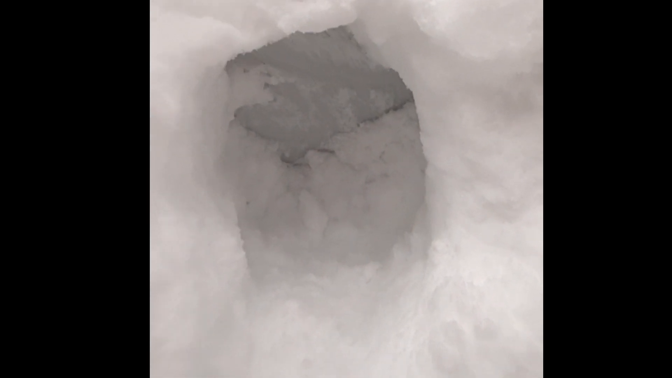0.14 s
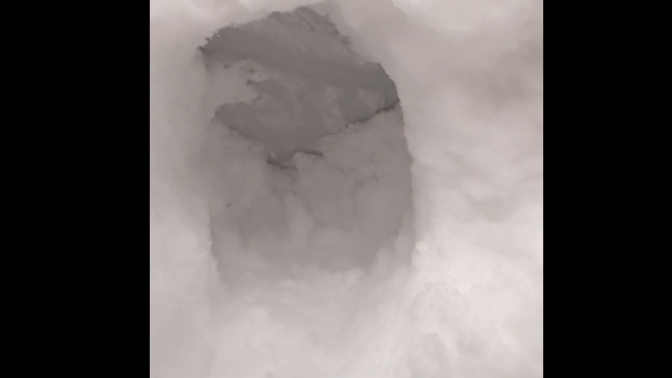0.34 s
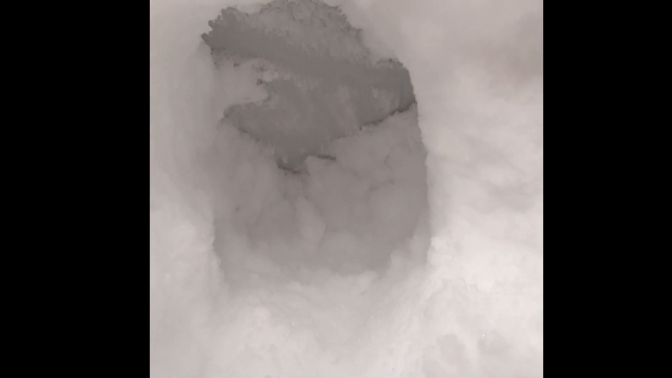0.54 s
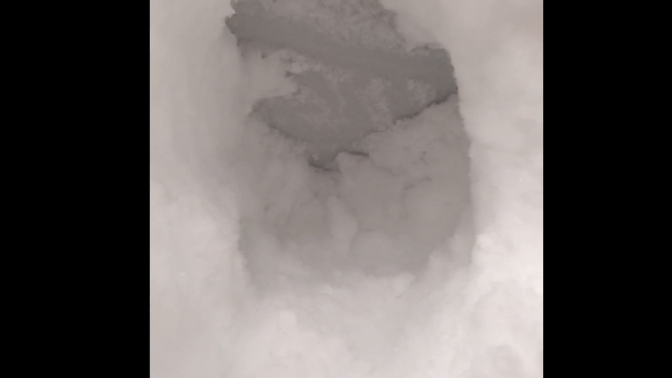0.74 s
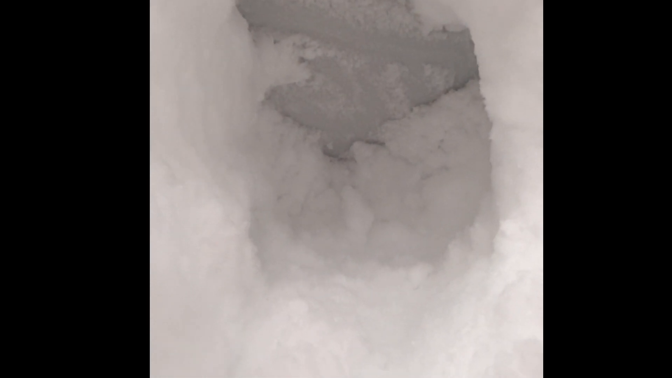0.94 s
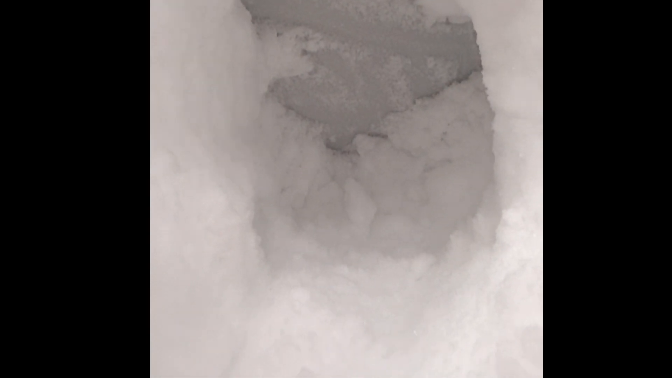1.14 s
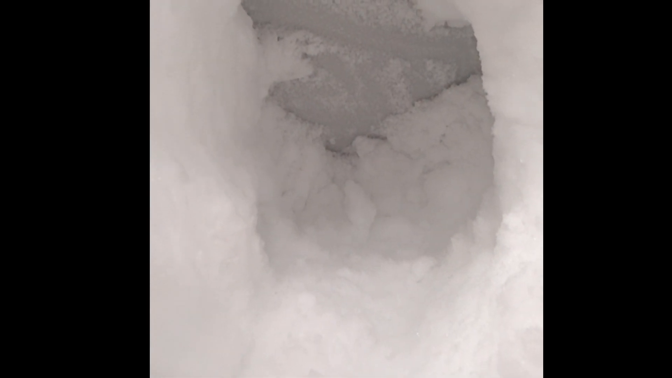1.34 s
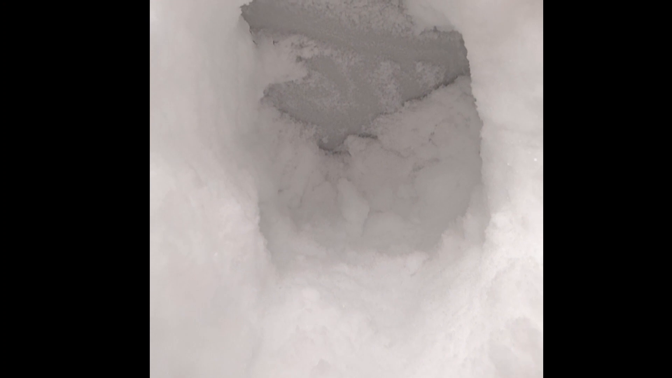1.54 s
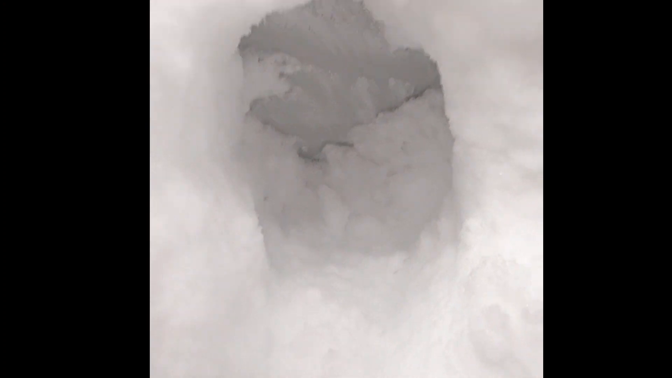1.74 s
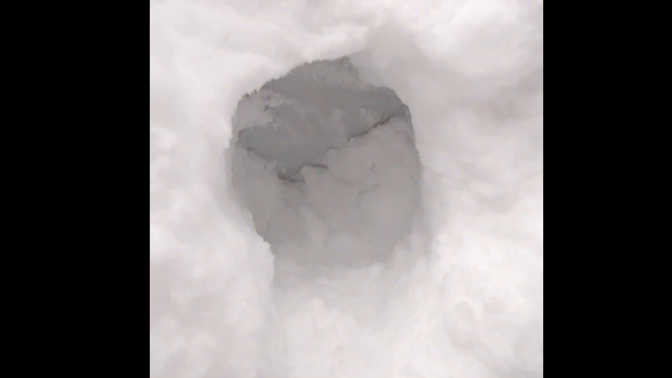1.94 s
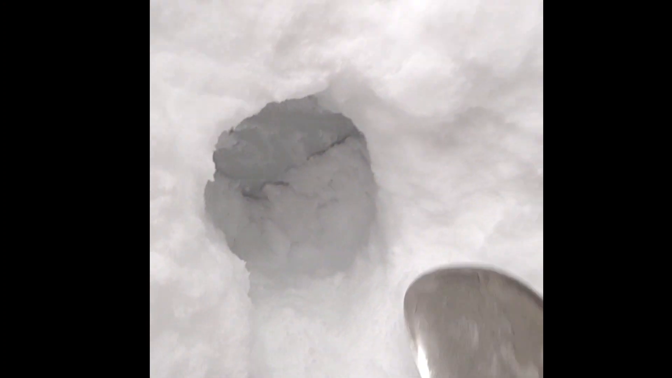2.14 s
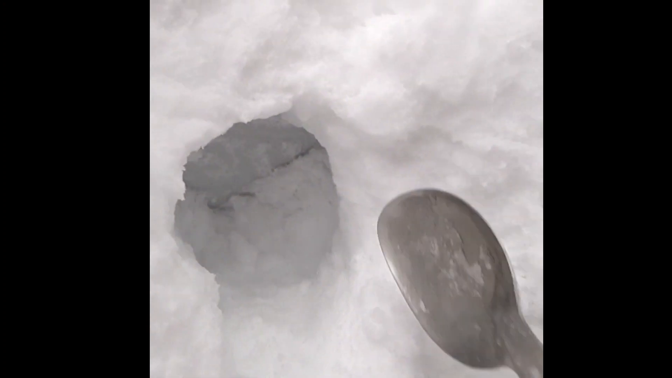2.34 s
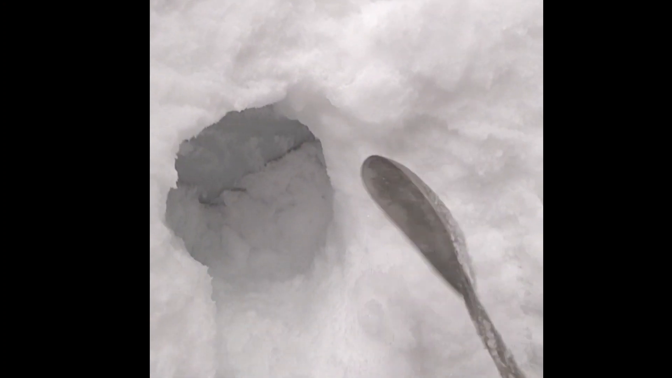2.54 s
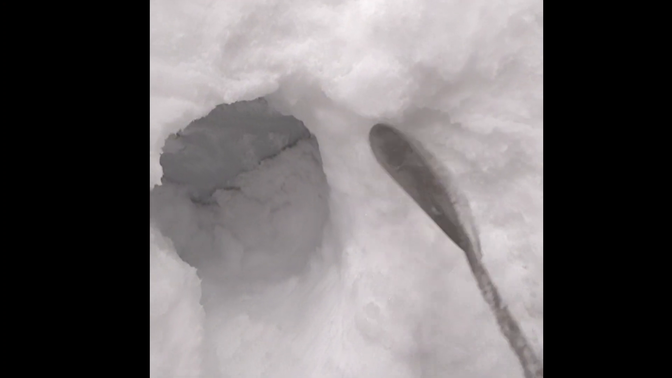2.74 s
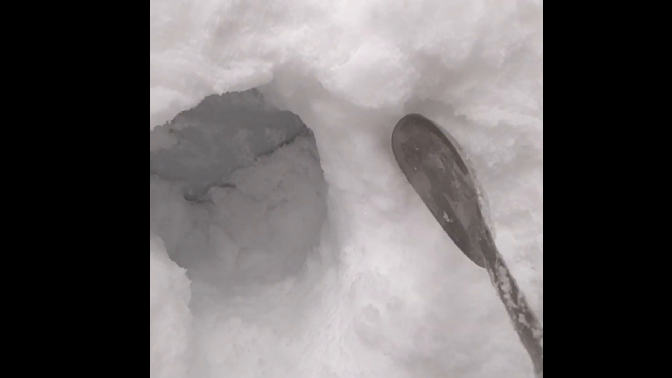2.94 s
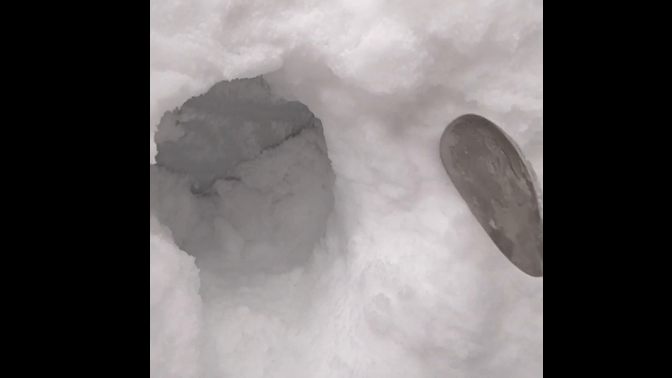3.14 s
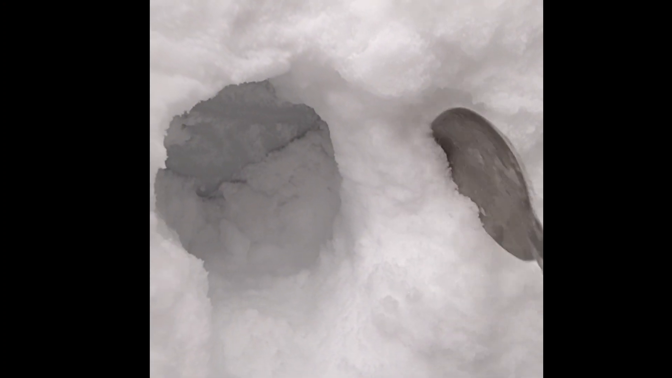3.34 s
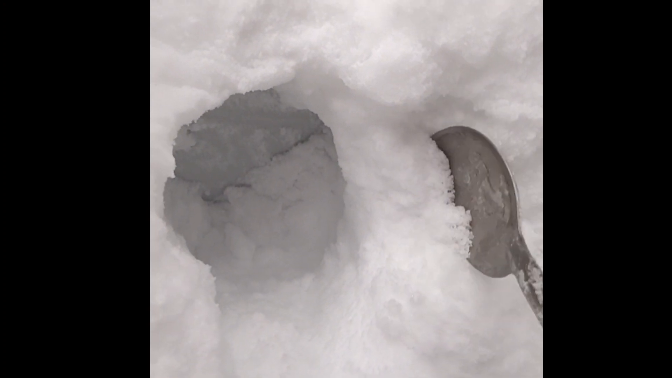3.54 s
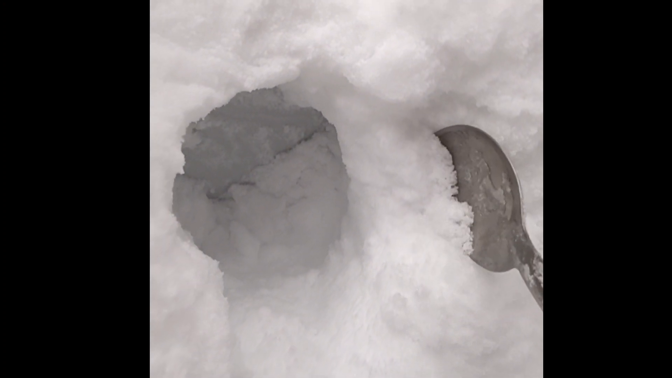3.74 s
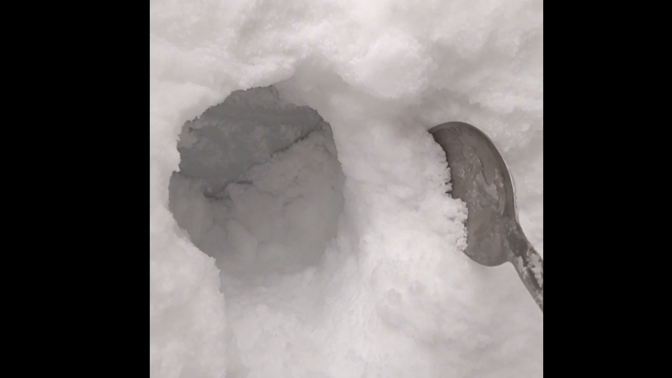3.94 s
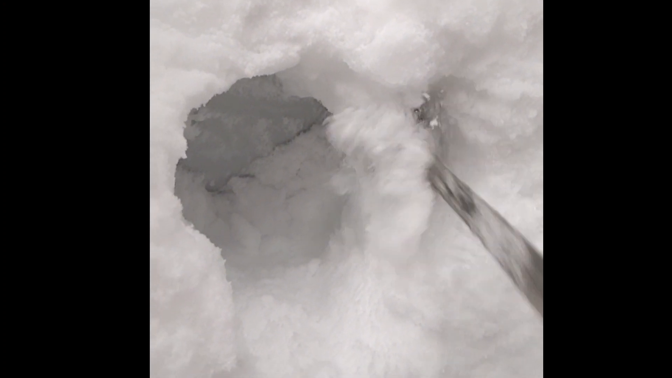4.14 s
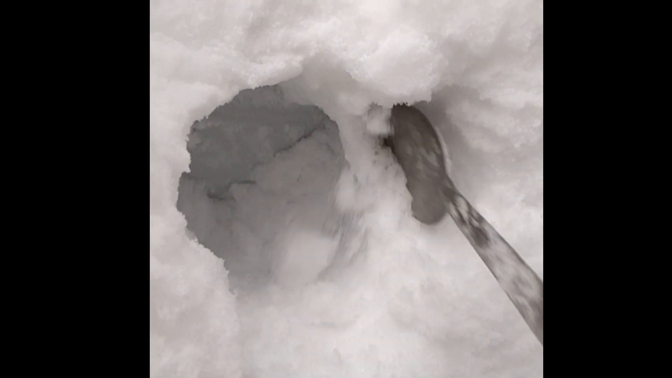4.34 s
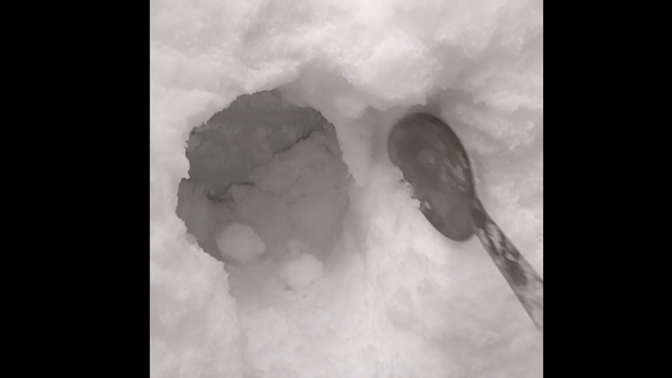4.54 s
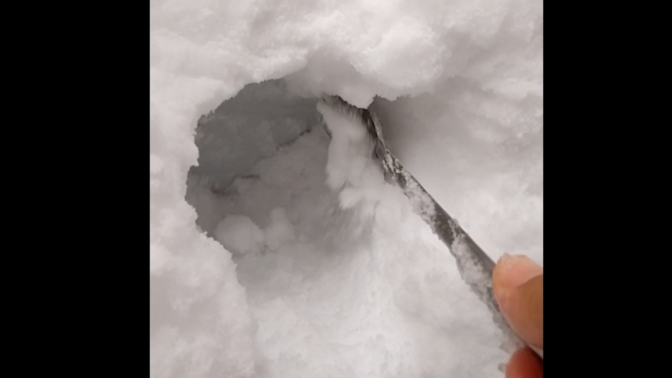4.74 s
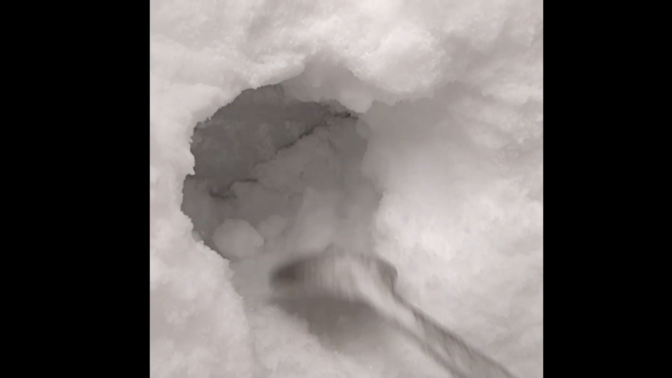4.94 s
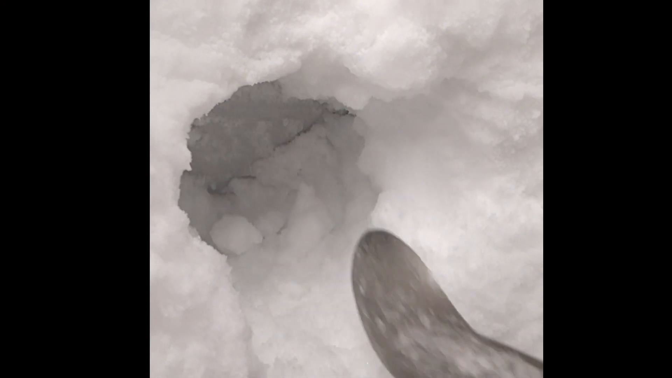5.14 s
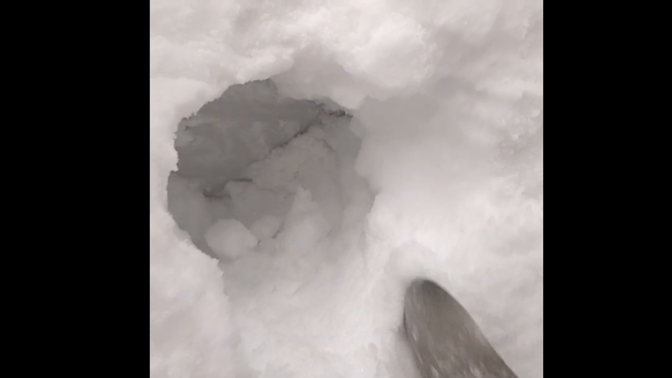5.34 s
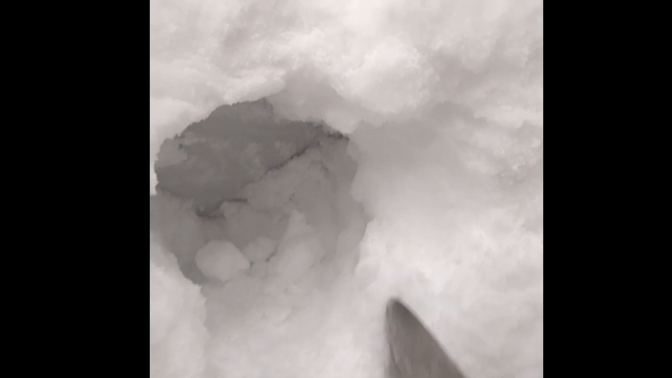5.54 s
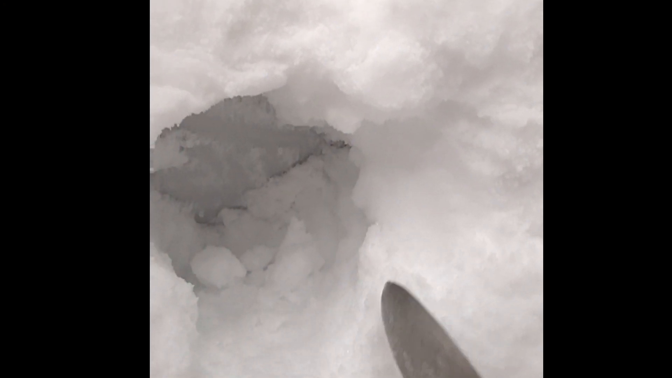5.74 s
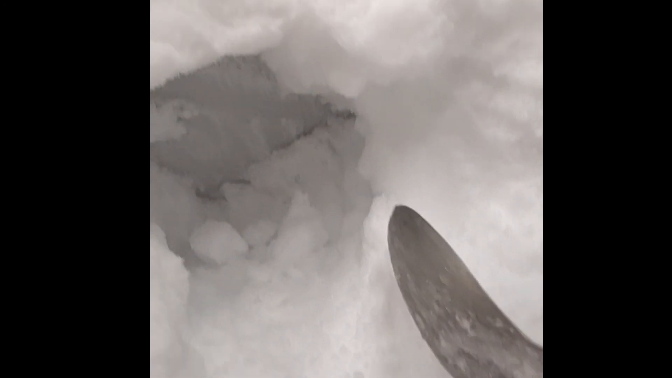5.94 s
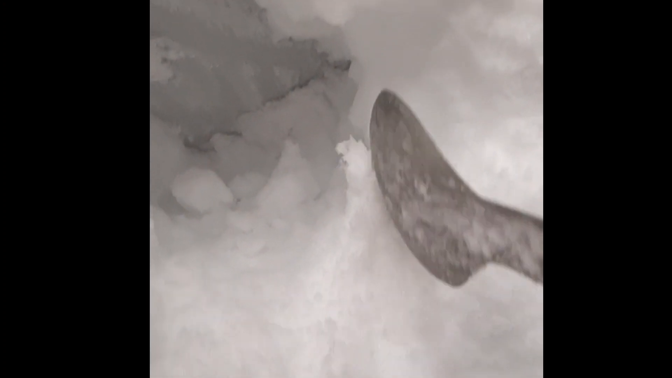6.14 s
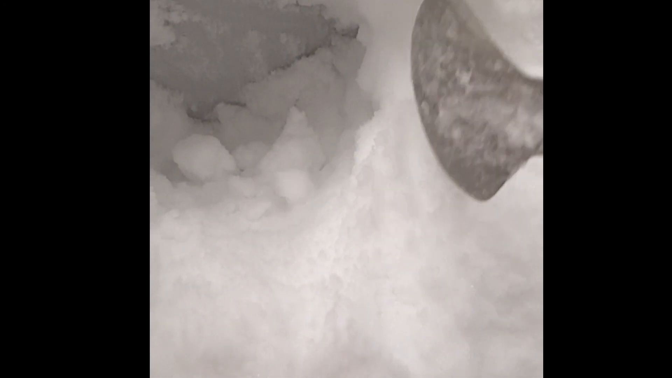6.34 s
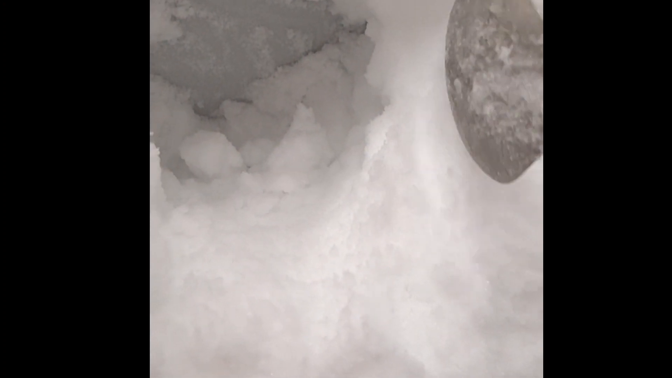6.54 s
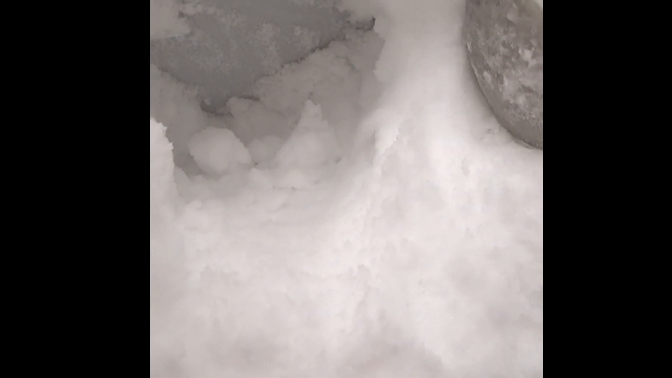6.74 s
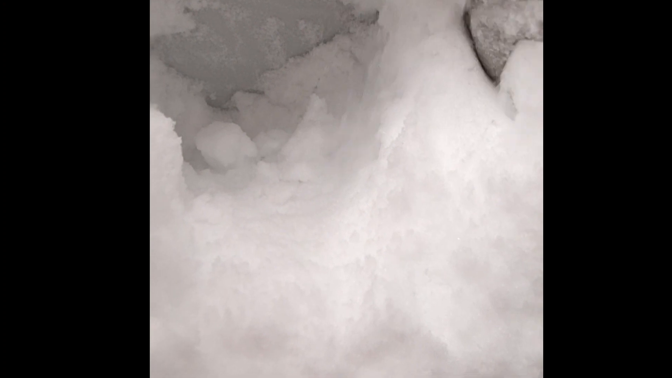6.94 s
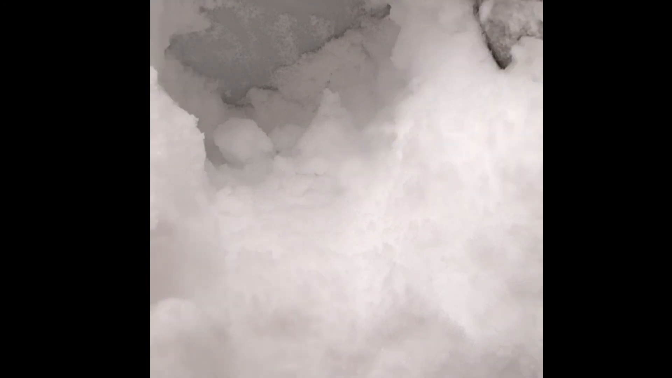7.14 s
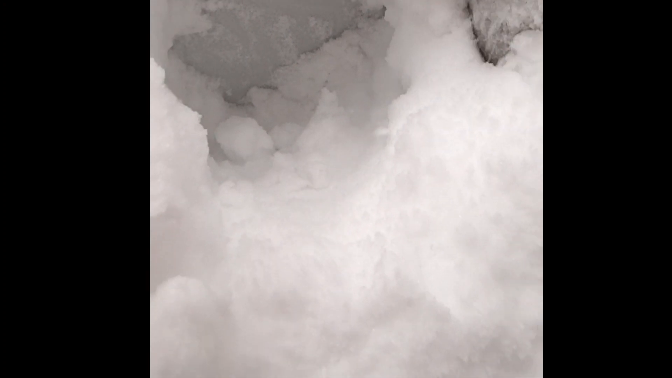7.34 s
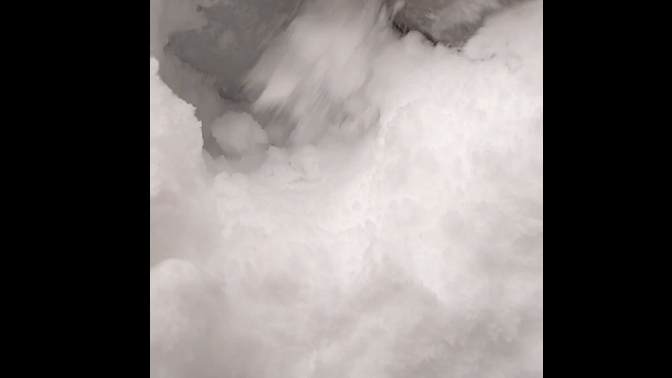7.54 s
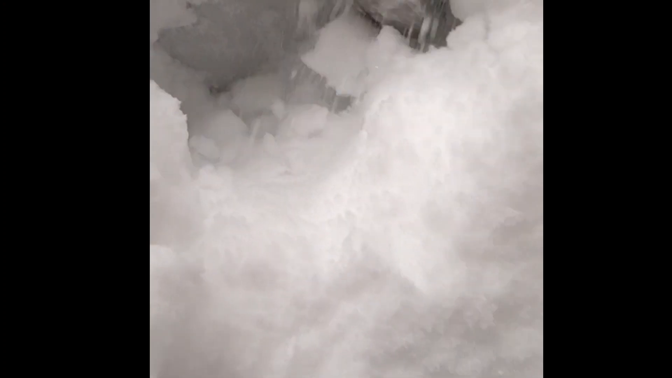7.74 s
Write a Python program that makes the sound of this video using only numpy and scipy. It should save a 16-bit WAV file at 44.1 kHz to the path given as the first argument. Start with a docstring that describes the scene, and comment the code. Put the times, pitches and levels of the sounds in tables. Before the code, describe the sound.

Close up, a spoon grazes, scrapes and then digs hard into crusty frost, crunching and cracking while the freezer wall booms underneath.

```python
"""Light brushing and short scrapes give way to deep crunching digs: a steel spoon in packed freezer frost, close by.
Each stroke is a random train of grain fractures, filtered by the ice, the spoon and the enclosed air.
Single crusts snap as short noise bursts; thumps are sines that sink in pitch.
The freezer wall booms as filtered knocks and sways as low noise.
Beneath lie filtered noise for hiss and fizz, and sines for a faint hum."""
import sys
import numpy as np
from scipy import signal
from scipy.fft import rfft, irfft, next_fast_len
from scipy.io import wavfile
from scipy.ndimage import uniform_filter1d, map_coordinates

SR = 44100
rng = np.random.default_rng(int(sys.argv[2]) if len(sys.argv) > 2 else 0)


def dump_mix(stems):
    """Bounce the given channels to the path in sys.argv[1] as a 16-bit WAV at rate SR."""
    frames = np.atleast_2d(stems).T  # one column per channel
    limited = np.clip(frames, -1, 1)  # hard clip at full scale
    pcm = np.round(limited * 32767).astype(np.int16)
    wavfile.write(sys.argv[1], SR, pcm)


N = 347949

# Room hiss spectrum. Each row: frequency in Hz, relative level in dB.
HISS_SPECTRUM = [(25, -8), (60, -19.5), (105, -1), (170, -25.5), (430, -21), (850, -29.5), (2400, -28.5),
                 (4000, -34), (15500, -52.5)]
# Appliance hum. Each row: frequency in Hz, level in dB rms, onset in seconds.
HUM_TONES = [(54, -57, 0), (119, -58, 5.1), (242, -63, 5.1)]
# Response of the freezer wall. Each row: frequency in Hz, gain in dB.
WALL_RESPONSE = [(40, -44.5), (80, -17), (145, -1), (180, -19.5), (220, -5), (320, -11.5), (480, -17.5),
                 (700, -18), (1400, -25), (2500, -44.5)]
# Resonances of the wall. Each row: frequency in Hz, half width in Hz, gain in dB.
WALL_RESONANCES = [(159, 12, 9.5), (237, 9.8, 0.5), (401.5, 1.3, 17.5), (450, 15, 10)]
# Spectrum of the swaying wall. Each row: frequency in Hz, relative level in dB.
SWAY_SPECTRUM = [(11, -61), (18, 4), (70, 2.5), (110, -4.5), (140, -35), (240, -120)]
# Sway of the wall under the load. Each row: time in seconds, level in dB before the left-right balance.
SWAY_LEVEL = [(0.0, -72), (1.27, -40), (1.36, -50.5), (3.25, -58.5), (3.41, -39.5), (3.84, -30), (4.0, -44),
              (4.22, -36.5), (4.55, -48), (5.45, -50), (6.57, -56), (6.74, -33), (7.49, -41.5), (7.56, -26),
              (7.6, -51.5), (7.89, -46)]
# Likeness of two spread channels. Each row: frequency in Hz, correlation from -1 to 1.
CHANNEL_LIKENESS = [(100, 0.99), (240, 0.68), (480, 0.36), (950, -0.67), (1900, 0.064), (3800, -0.15)]
# Frost giving way against the wall. Each row: start in seconds, peak in dB before the balance and mix gain,
# first pitch in Hz, settled pitch in Hz.
WALL_THUMPS = [(0.664, -37, 404, 162), (1.178, -23.5, 323, 292), (1.940, -35.5, 308, 136),
               (2.908, -37, 293, 133), (3.31, -26.5, 259, 129), (3.387, -26.5, 324, 205),
               (3.46, -20, 266, 198), (3.567, -20, 263, 146), (3.72, -23.5, 129, 69),
               (4.744, -14.5, 239, 132), (5.363, -22, 410, 304), (5.843, -38.5, 139, 119.5),
               (6.44, -22.5, 263, 135), (6.619, -15.5, 220, 118), (6.876, -9, 164.7, 131.4),
               (7.238, -10.5, 196.4, 136), (7.549, -10, 205, 110.4), (7.714, -16, 293, 119)]
# Crusts that snap. Each row: time in seconds, peak in dB before the mix gain, pitch in Hz.
CRUST_SNAPS = [(.731, -31.5, 8300), (0.989, -27.5, 9600), (1.203, -37, 2230), (1.666, -14, 10000),
               (1.9782, -15.5, 11600), (2.0073, -13, 4830), (2.747, -26, 3070), (2.765, -10, 2700),
               (3.306, -5.5, 3160), (3.506, -32, 3170), (3.667, -11, 11700), (3.665, -6, 5260),
               (4.703, -9, 9000), (4.928, -12, 11200), (4.965, -17.5, 10960), (5.065, -11, 13200),
               (5.071, -13, 4560), (5.814, -22.5, 10260), (6.429, -13, 7500), (6.616, 1, 11000),
               (6.768, -4, 10300), (7.154, -12.5, 2830), (7.205, -20, 10000), (7.229, -17, 6700),
               (7.298, -9.5, 3930), (7.383, -23, 4600), (7.436, -19.5, 10180), (7.56, -31, 1400),
               (7.673, -8, 2200), (7.703, 1.5, 11300)]
# Spells of prising at a chunk. Each row: start in seconds, end in seconds, typical peak in dB before the mix gain.
PRISING_SPELLS = [(4.817, 5.032, -22), (7.16, 7.52, -14)]
# Spectrum of crushed ice. Each row: frequency in Hz, gain in dB.
CRUSHED_ICE = [(150, -43.5), (400, 1), (700, -9), (1700, -12), (2500, -4), (4500, -2), (6000, -4.5),
               (7200, -1.5), (8000, -4), (9800, 2), (11500, 4.5), (13000, -5.5), (14500, 3.5),
               (15500, -0.5)]
# Air in the dug pocket. Each row: frequency in Hz, half width in Hz.
POCKET_RESONANCES = [(7300, 240), (9200, 1100)]
# Ways in which the spoon meets the frost. Each row: spoon ring in Hz, spoon ring in dB before the mode factor,
# pocket weight in dB, left-right balance in dB, box resonance in dB.
BRUSH = (4100, 5.3, 10.7, 3.9, 24)
GRAZE = (2682, 5.5, -2.5, -0.5, -19.5)
RASP = (3046, 16, 1.6, 1.4, 9.6)
SCOOP = (3419.5, 1, 4, -2, 0)
SLIDE = (4346, 6.5, 12.5, -2.5, 4)
DIG = (2080, 5, 7.5, -6, 6.5)
RUSTLE = (4080, 16, 7.8, 5.5, 25)
# Strokes of the spoon. Each row: start in seconds, attack in seconds, length in seconds,
# crush level in dB before the mix gain, swell over the hold in dB, wall boom in dB before the wall gains,
# tilt in dB per octave, contact.
SPOON_STROKES = [(0.026, 0.0067, 0.11, -55, -3, -62, -6, GRAZE),
                 (0.175, 0.067, 0.17, -38.5, -4, -79, 4, BRUSH),
                 (.275, 0.024, 0.34, -30, -7, -47.5, -0.5, BRUSH),
                 (0.642, 0.0072, 0.24, -47, -13, -52, -7, BRUSH),
                 (.82, 0.033, .22, -48.5, 4, -51.5, -5, BRUSH),
                 (1.05, 0.012, 0.15, -56.5, -1, -53, -8, BRUSH),
                 (1.147, 0.012, 0.093, -42.5, -10, -47, -12, BRUSH),
                 (1.421, 0.096, .245, -49, 10, -73, 2, RUSTLE),
                 (1.929, 0.0079, .065, -50, -4.5, -48, -3.5, GRAZE),
                 (2.008, 0.0014, 0.022, -34, -6.5, -57, -1.5, SCOOP),
                 (2.177, 0.0083, 0.096, -53.5, -5, -70, 0.5, GRAZE),
                 (2.318, 0.00092, 0.057, -38.5, -15.5, -63, -2, GRAZE),
                 (2.386, 0.032, .25, -54.5, -8, -69, -4, GRAZE),
                 (2.743, 0.0014, 0.025, -43.5, -2.5, -62.5, -1.5, RASP),
                 (2.889, 0.012, 0.036, -24, -7, -31.5, 2, RASP),
                 (3.008, 0.005, 0.17, -44.5, 6, -49, -1, RASP),
                 (3.192, 0.014, 0.13, -27, -5.5, -36, -1.1, RASP),
                 (3.371, 0.0015, 0.11, -30, 7, -35.5, -2.6, RASP),
                 (3.532, 0.0019, 0.062, -26, 1, -28.5, -2, GRAZE),
                 (3.696, 0.0094, 0.032, -31, 0.5, -27.5, -4, SCOOP),
                 (3.759, 0.027, 0.06, -58.5, 12, -56, -10, SCOOP),
                 (4.024, 0.0068, 0.15, -54.5, -8, -54, -1.5, SCOOP),
                 (4.107, 0.032, 0.18, -16.5, -5, -17, -2.5, SCOOP),
                 (4.309, 0.073, 0.27, -34, -3.5, -42.5, -3, SCOOP),
                 (4.597, 0.12, .19, -21, -6.5, -27, -2.5, SCOOP),
                 (4.791, 0.0065, 0.19, -37.5, -9, -37, -4.5, SCOOP),
                 (5.013, .006, 0.14, -43.5, -10, -39.5, 1, SCOOP),
                 (5.265, 0.047, .26, -35.5, -5, -41.5, -2, SLIDE),
                 (5.536, 0.0049, 0.29, -49.5, -13, -54.5, -4, SLIDE),
                 (6.03, 0.01, 0.2, -56.5, 17.5, -73, 1.5, SLIDE),
                 (6.299, 0.071, 0.088, -40, -2, -54.5, -1, SLIDE),
                 (6.412, 0.02, 0.017, -25.5, 8.5, -35, 2, SCOOP),
                 (6.551, 0.005, 0.046, -36, 4.5, -33, 1, SCOOP),
                 (6.605, 0.0041, 0.11, -22, 5.5, -24.5, 0, DIG),
                 (6.767, 0.009, 0.32, -23.5, 0.5, -21, -3, DIG),
                 (7.135, .012, 0.065, -35, -5.5, -18.5, -12.5, DIG),
                 (7.223, .002, 0.12, -29.5, -1, -22, -5.5, DIG),
                 (7.369, .012, 0.21, -35.5, -1.5, -24, -5, DIG),
                 (7.529, 0.012, 0.18, -19.5, -16, -22.5, -2.5, DIG),
                 (7.694, 0.0023, 0.16, -24.5, -12, -31.5, -1.5, DIG)]

HISS_DB = -57
FIZZ_DB, FIZZ_TILT = -66.5, -1  # dB, dB/octave
FIZZ_DRIFT_DB = 4
TOP_HZ = 15650  # band limit of the phone
ATTACK_DB = 14  # a stroke enters this far below its hold level
# Crushing stops fast; loose crumbs trickle on.
CRUSH_RELEASE_DB_PER_S, CRUMBS_DB, CRUMBS_DB_PER_S = 803, -19, 124
# The wall takes up the load late and sheds it slowly.
WALL_LAG_S, WALL_ATTACK_S, WALL_RELEASE_DB_PER_S = 0.021, 0.013, 307.5
FADE_IN_S = 0.0026  # time constant of the short fade-in of each stroke
RELEASE_S = .25  # time allowed for each release
# Strokes above BODY_FROM_DB break coarser, lower grains.
BODY_HZ, BODY_WIDTH_HZ, BODY_DB_PER_DB, BODY_FROM_DB = 1040, 100, 0.4165, -20
CRACKLE_SCATTER_DB, CRACKLE_HZ, CRACKLE_OCTAVES = 2.5, 7000, 0.6
SNAP_CUT_DB_PER_OCTAVE = 1  # gentle cut of a snap's sound far below its own pitch


def amp(db):
    """Amplitude ratio: the inverse of the decibel law."""
    return 10 ** (np.asarray(db) / 20)


def unit(x):
    """Normalisation to unit rms."""
    return x / np.sqrt(np.mean(x ** 2) + 1e-20)


def along(points, hz):
    """Interpolation of (Hz, value) points on a logarithmic frequency axis."""
    f, v = np.transpose(points)
    return np.interp(np.log(hz + 1), np.log(f + 1), v)


def curve(rows):
    """Linear interpolation of (s, value) rows, one value per sample."""
    return np.interp(np.arange(N) / SR, *np.transpose(rows))


def wobble(rate, size):
    """Slow random fluctuation: a smooth curve through random knots, rate of them a second."""
    knots = rng.standard_normal(int(size * rate / SR) + 4)
    return map_coordinates(knots, [np.arange(size) * rate / SR])


def bump(hz, centre, width):
    """Lorentzian resonance shape, 1 at its centre."""
    return 1 / (1 + ((hz - centre) / width) ** 2)


def coloured(x, gain_db):
    """Minimum-phase filtering: the folded cepstrum makes a causal response from a gain in dB over frequency."""
    m = 2 * next_fast_len(x.shape[-1] // 2 + 2048)
    gain = amp(gain_db(np.fft.rfftfreq(m, 1 / SR)))
    cepstrum = irfft(np.log(gain + 1e-6), m)
    cepstrum[..., 1:m // 2] *= 2
    cepstrum[..., m // 2 + 1:] = 0
    response = np.exp(rfft(cepstrum))
    return irfft(rfft(x, m) * response, m)[..., :x.shape[-1]]


def spread(pair):
    """Partial coherence: sum and difference of two unrelated signals set the likeness of the two channels."""
    m = next_fast_len(N)
    likeness = np.clip(along(CHANNEL_LIKENESS, np.fft.rfftfreq(m, 1 / SR)), -1, 1)
    turn = np.arccos(likeness) / 2
    mid, side = irfft(rfft(pair, m) * [np.cos(turn), np.sin(turn)], m)[:, :N]
    return np.array([mid + side, mid - side]) / np.std(mid)


def add(track, s, x):
    """Superposition: mix x into the track from time s."""
    i = max(round(s * SR), 0)
    track[..., i:i + x.shape[-1]] += x[..., :N - i]


def fractures(size, rate, scatter_db, lag=.0005):
    """Shot noise: random cracks of clipped log-normal size, each with its own delay of up to lag per microphone."""
    count = int(size * rate / SR)
    when = rng.integers(0, size, count)
    sign = rng.choice([-1, 1], count)
    push = sign * amp(scatter_db * np.clip(rng.standard_normal(count), -2, 2))
    sides = []
    for _ in range(2):
        delay = (rng.random(count) * lag * SR).astype(int)
        sides.append(np.bincount(when + delay, push, size)[:size])
    return np.array(sides)


def chunky(pair, depth_db, size):
    """Time-varying spectrum: chunks of different sizes each favour their own pitches for a short while."""
    z = signal.stft(pair, nperseg=size)[2]
    field = uniform_filter1d(rng.standard_normal(z.shape[1:]), 2, 0)
    field = uniform_filter1d(field, size=10, axis=1)
    return signal.istft(z * amp(depth_db * unit(field)), nperseg=size)[1][:, :pair.shape[1]]


def compartment(x, tail_db, tail_t60):
    """Reverberation: direct sound, weak quick echoes off the icy walls and a short tail, drawn anew each time."""
    t = np.arange(SR // 6) / SR

    def echoes(t60):
        """Exponentially decaying noise, of unit energy per channel on average."""
        return unit(rng.standard_normal((2, len(t))) * amp(-60 * t / t60)) / np.sqrt(len(t))

    paths = amp(-4) * echoes(.018)
    paths += amp(min(tail_db, -6)) * echoes(tail_t60)
    paths[:, 0] += 1  # direct sound
    return signal.fftconvolve(x, paths, axes=1)


def ice_colour(hz, tilt, ring_hz, ring_db, pocket_db, pan_db, box_db):
    """Resonance shaping, in dB per microphone: ice, damped spoon modes, and air in the pocket and the box."""
    ice = along(CRUSHED_ICE, hz) + tilt * np.log2(np.maximum(hz, 1500) / 5000)
    bowl_modes = bump(hz, 0.94 * ring_hz, 170) + bump(hz, 1.046 * ring_hz, 180)  # a close pair
    spoon = ring_db * bowl_modes * 0.7
    box = box_db * bump(hz, 280, 71)
    pocket = pocket_db * sum(bump(hz, centre, width) for centre, width in POCKET_RESONANCES)
    # Left-right difference in dB; the left port is duller at the very top.
    lean = pan_db + along([(400, -1.0), (1500, -6.0), (4500, 0.5), (9500, 1), (14000, -10.0)], hz)
    return ice + spoon + box + np.array([pocket + lean / 2, 0.046 * pocket - lean / 2])


def background():
    """Steady noise and tones: room hiss, the faint fizz of settling frost and the low hum of appliances."""
    hiss = spread(coloured(rng.standard_normal((2, N)), lambda hz: along(HISS_SPECTRUM, hz)))

    def fizz_colour(hz):
        """Gain in dB of the settling frost."""
        return ice_colour(hz, FIZZ_TILT, ring_hz=4330, ring_db=5, pocket_db=8, pan_db=0, box_db=10)

    fizz = unit(coloured(rng.standard_normal((2, N)), fizz_colour))
    fizz_level = amp(FIZZ_DB + FIZZ_DRIFT_DB * wobble(29, N))
    t = np.arange(N) / SR
    hum = np.zeros(N)
    for hz, db, s in HUM_TONES:
        tone = np.sqrt(2) * np.sin(2 * np.pi * hz * t + 0.25 * wobble(3.0, N))
        hum += amp(db) * tone * np.clip((t - s) / 0.17, 0, 1)
    return hiss * amp(HISS_DB) + fizz * fizz_level + hum


def hold_db(t, attack, length, swell_db):
    """Envelope of the applied force in dB: a rise, then a hold that swells or sags."""
    rise = np.clip(t / max(attack, 1 / SR), 0, 1)
    held = np.clip((t - attack) / max(length - attack, 1 / SR), 0, 1)
    return ATTACK_DB * (rise - 1) + swell_db * held


def push():
    """Power summation: the force that overlapping strokes pass into the freezer wall."""
    power = np.zeros(N)
    for s, attack, length, _, swell_db, wall_db, *_ in SPOON_STROKES:
        t = np.arange(int((length + RELEASE_S) * SR)) / SR
        db = wall_db + hold_db(t, attack + WALL_ATTACK_S, length, swell_db)
        db -= WALL_RELEASE_DB_PER_S * np.maximum(t - length, 0)
        add(power, s + WALL_LAG_S, amp(db) ** 2)
    return np.sqrt(power)


def wall():
    """Forced panel vibration: slips of the spoon drum on the frost-damped wall, which also sways under load."""
    knocks = np.array([fractures(N, 900, 4.1)[0] for side in range(2)]) * amp(0.61 * wobble(42, N))

    def panel(hz):
        """Panel gain in dB: broad response plus resonances."""
        modes = sum(db * bump(hz, centre, width) for centre, width, db in WALL_RESONANCES)
        return along(WALL_RESPONSE, hz) + modes

    boom = spread(coloured(knocks, panel)) * push() * amp(-2.5)
    rumble = coloured(rng.standard_normal((2, N)), lambda hz: along(SWAY_SPECTRUM, hz))
    sway = spread(rumble) * amp(curve(SWAY_LEVEL))
    return (boom + sway) * amp([[.8], [-.8]])  # slightly stronger on the left


def thumps(cycles=24, attack=0.008, settle=0.0193, rattle_db=6.5):
    """Dispersion of bending waves: high parts come first and die soonest, so each thump sinks in pitch."""
    out, t = np.zeros(N), np.arange(SR // 5) / SR
    for s, db, first_hz, settled_hz in WALL_THUMPS:
        pitch = settled_hz + (first_hz - settled_hz) * np.exp(-t / settle)
        turns = np.cumsum(pitch) / SR
        # The ring decays by 60 dB over the given number of cycles.
        decay = amp(-60 * turns / cycles + rattle_db * wobble(134, len(t)))
        fade = (1 - np.exp(-t / attack)) * decay
        # Crumbling frost jolts the wall, which roughens the ring into a thud.
        jolts = .7 * wobble(220, len(t)) + .35 * wobble(900, len(t))
        wave = fade * np.sin(2 * np.pi * turns + jolts)
        add(out, s, amp(db) * wave / np.abs(wave).max())
    return out * amp([[1.3], [-1.3]])  # slightly stronger on the left


def crackle(count=8):
    """Random brittle failure: small snaps scattered through each spell of prising, as (s, peak dB, pitch Hz)."""
    rows = []
    for start, end, db in PRISING_SPELLS:
        when = start + (end - start) * (np.arange(count) + rng.random(count)) / count
        size, octaves = rng.standard_normal((count, 2)).T
        pitch = CRACKLE_HZ * 2 ** (CRACKLE_OCTAVES * octaves)
        rows += zip(when, db + CRACKLE_SCATTER_DB * size, pitch)
    return rows


def snaps(t60=0.0039, lead=0.0045, crumble_db=-22, crumble_t60=0.03, ring_db=12):
    """Brittle fracture: a crust bursts after a short swell, rings at its own pitch and sheds a few crumbs."""
    out, t = np.zeros((2, N)), np.arange(-SR // 100, SR // 16) / SR
    crumbs = amp(crumble_db - 60 * np.abs(t) / np.where(t < 0, .025, crumble_t60))
    for s, db, pitch in CRUST_SNAPS + crackle():
        decay_t60 = t60 * np.sqrt(CRACKLE_HZ / pitch)  # small shards die sooner
        crack = amp(-60 * np.abs(t) / np.where(t < 0, lead, decay_t60))
        burst = chunky(rng.standard_normal((2, len(t))), depth_db=5.0, size=128) * (crack + crumbs)

        def colour(hz):
            """Gain in dB of the shard within the ice."""
            octaves_below = np.log2(np.maximum(.35 * pitch / (hz + 1), 1))
            shard = ring_db * bump(hz, pitch, .3 * pitch) - SNAP_CUT_DB_PER_OCTAVE * octaves_below
            return shard + ice_colour(hz, tilt=0.86, ring_hz=2920, ring_db=10.0, pocket_db=4.5,
                                      pan_db=-0.5, box_db=-5.5)

        heard = coloured(compartment(burst, tail_db=-7, tail_t60=0.099), colour)
        add(out, s + t[0], heard * amp(db) / np.abs(heard.mean(0)).max())
    return out


def effort(attack, length, swell_db):
    """Loading and release: the crushing force of one stroke, with the trickle of crumbs after it."""
    t = np.arange(int((length + RELEASE_S) * SR)) / SR
    after = np.maximum(t - length, 0)
    release = np.maximum(amp(-CRUSH_RELEASE_DB_PER_S * after), amp(CRUMBS_DB - CRUMBS_DB_PER_S * after))
    return amp(hold_db(t, attack, length, swell_db)) * (1 - np.exp(-t / FADE_IN_S)) * release


def crunch(rate=2600, scatter_db=2.0, clump_db=0.5, clump_rate=280, judder_db=1.12, tremor_db=3.0,
           powder_db=-8, chunk_db=3.0, crust_rate=130, crust_db=-6):
    """Stick-slip friction: each stroke crushes grains in clumps as the spoon's edge sticks and slips."""
    out = np.zeros((2, N))
    for s, attack, length, crush_db, swell_db, _, tilt, contact in SPOON_STROKES:
        size = SR  # a second of grains outlasts any stroke
        grains = unit(fractures(size, rate, scatter_db))
        grains += amp(powder_db) * rng.standard_normal((2, size))
        grains += amp(crust_db) * unit(fractures(size, crust_rate, scatter_db=4.5))  # sparse coarse cracks
        slips = amp(clump_db * wobble(clump_rate, size) + judder_db * wobble(57.5, size)
                    + tremor_db * wobble(19, size))
        level = amp(crush_db) * effort(attack, length, swell_db)[:size]
        force = unit(chunky(grains, chunk_db, size=256) * slips)[:, :len(level)] * level
        body_db = BODY_DB_PER_DB * max(crush_db - BODY_FROM_DB, 0)

        def colour(hz):
            """Gain in dB of the ice with its coarse body."""
            return ice_colour(hz, tilt, *contact) + body_db * bump(hz, BODY_HZ, BODY_WIDTH_HZ)

        heard = coloured(compartment(force, tail_db=-9.0, tail_t60=0.15), colour)
        # The mean of the two sides takes the energy of the force on the left.
        add(out, s, heard * np.linalg.norm(force[0]) / np.linalg.norm(heard.mean(0)))
    return out


def scene():
    """Superposition of the background, the wall and the breaking frost."""
    return background() + wall() + amp(0.5) * thumps() + amp(-1.3) * snaps() + amp(2.0) * crunch()


def record(dry):
    """Saturation and band limiting: the phone rounds off the highest peaks and cuts all above its limit."""
    m = next_fast_len(N + SR // 4)
    rounded = dry / (1 + (dry / .85) ** 4) ** .25
    passed = .5 - .5 * np.tanh((np.fft.rfftfreq(m, 1 / SR) - TOP_HZ) / 110)
    return irfft(rfft(rounded, m) * passed, m)[:, :N]


dry = scene()
out = record(dry)
dump_mix(out)
```